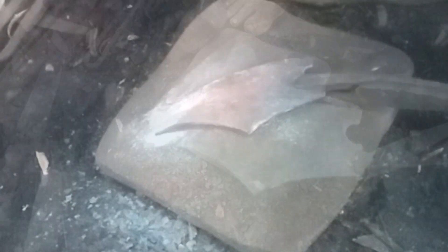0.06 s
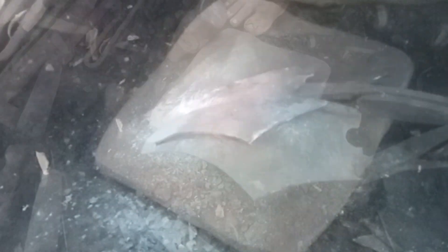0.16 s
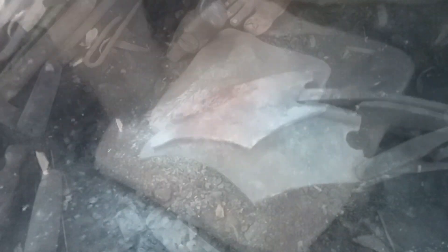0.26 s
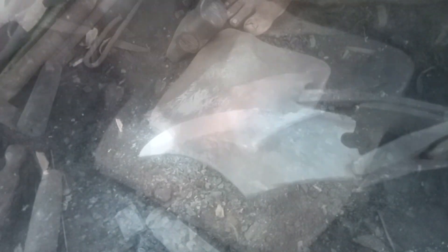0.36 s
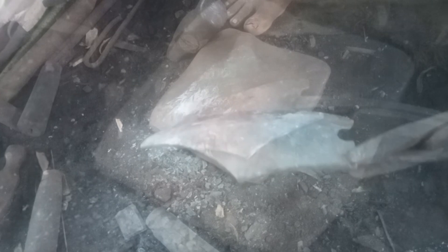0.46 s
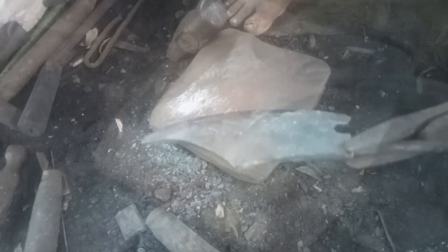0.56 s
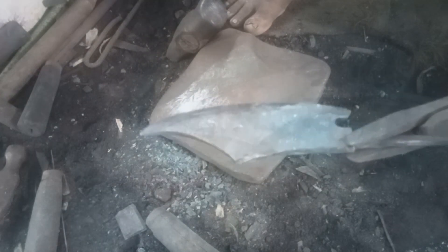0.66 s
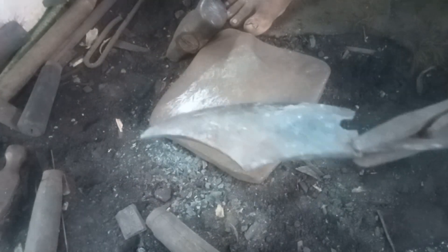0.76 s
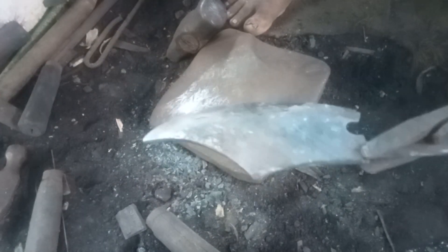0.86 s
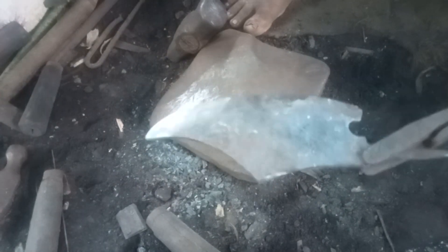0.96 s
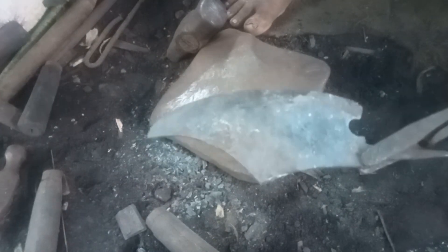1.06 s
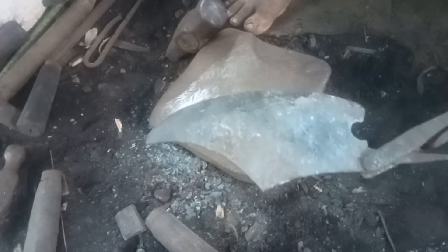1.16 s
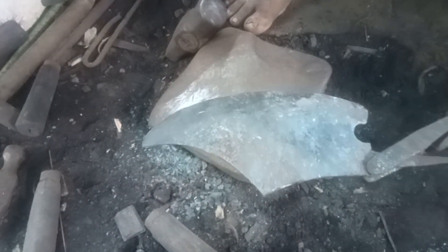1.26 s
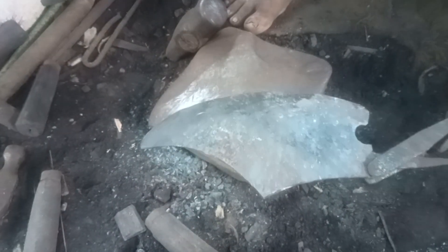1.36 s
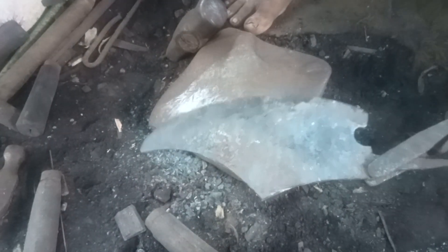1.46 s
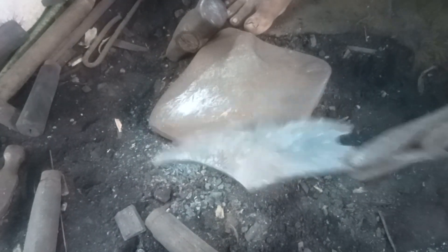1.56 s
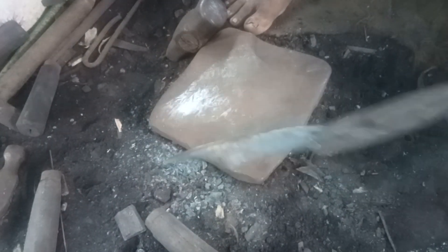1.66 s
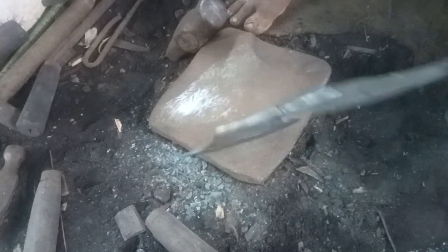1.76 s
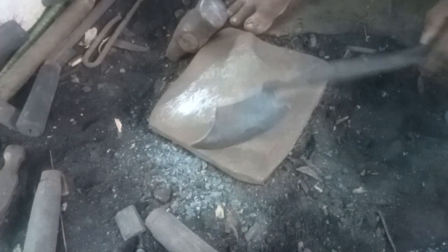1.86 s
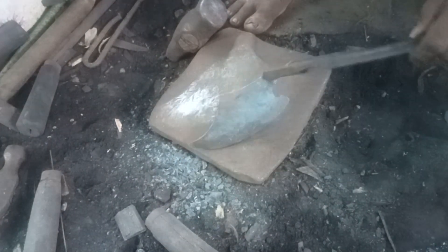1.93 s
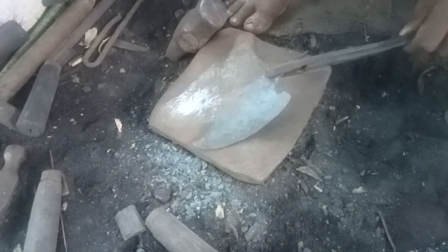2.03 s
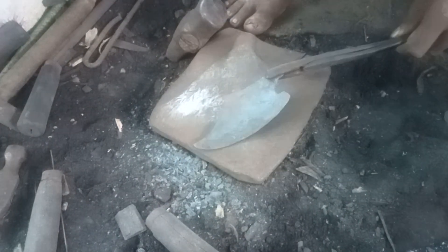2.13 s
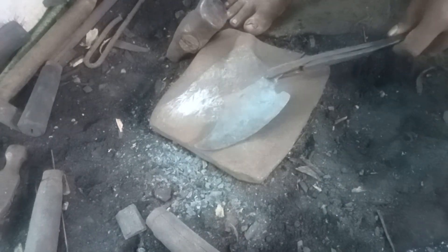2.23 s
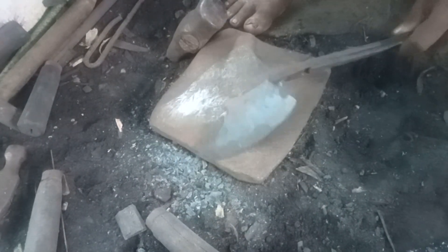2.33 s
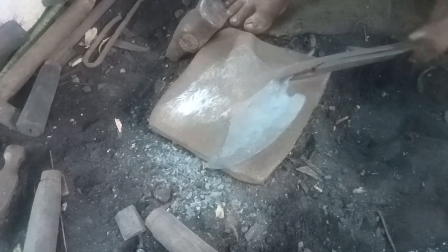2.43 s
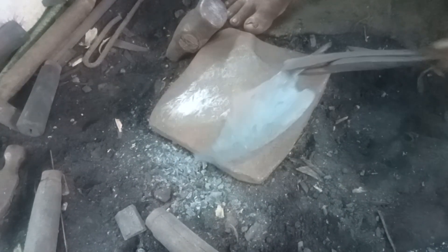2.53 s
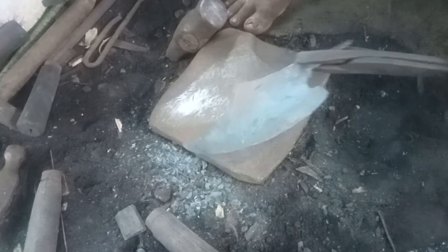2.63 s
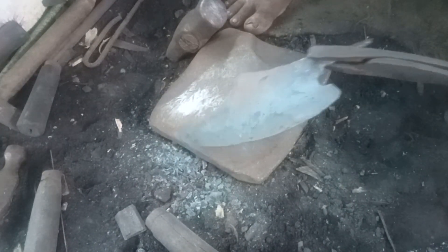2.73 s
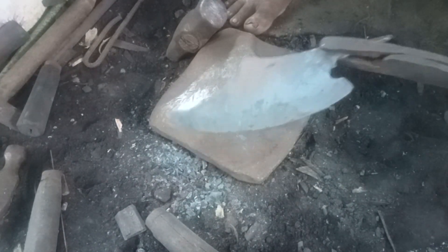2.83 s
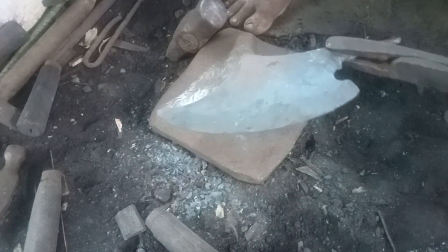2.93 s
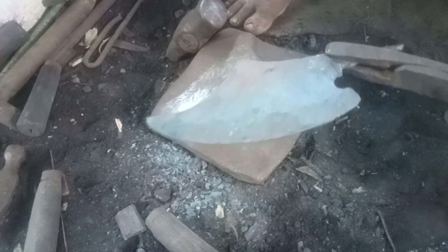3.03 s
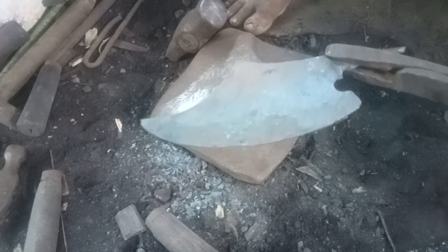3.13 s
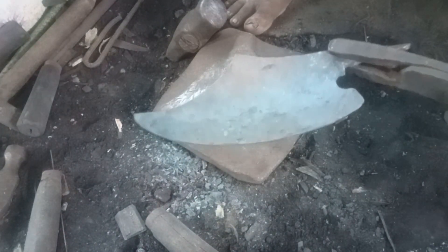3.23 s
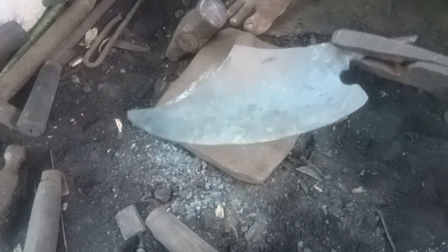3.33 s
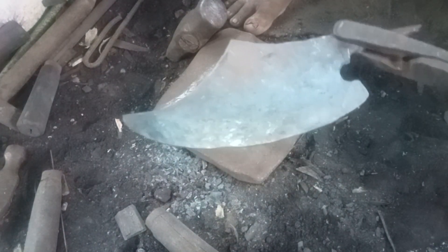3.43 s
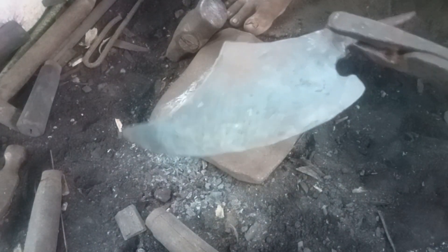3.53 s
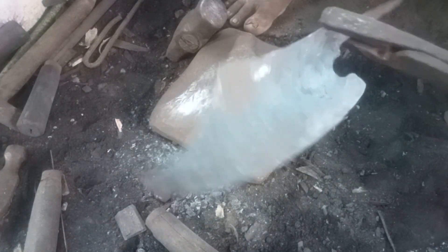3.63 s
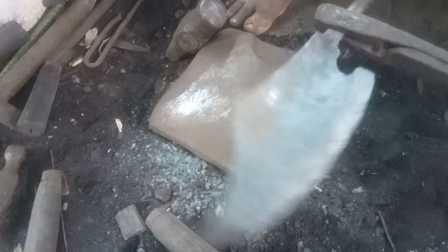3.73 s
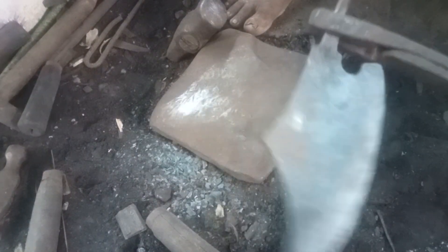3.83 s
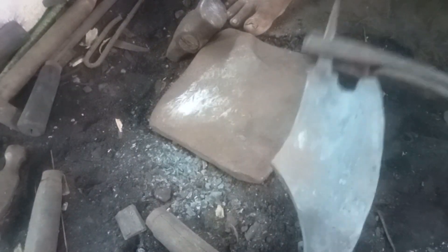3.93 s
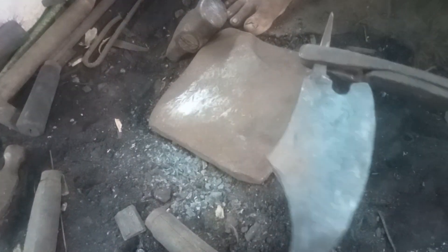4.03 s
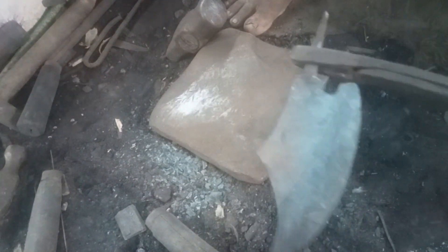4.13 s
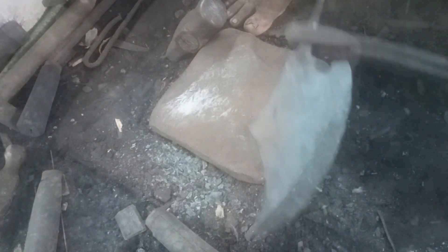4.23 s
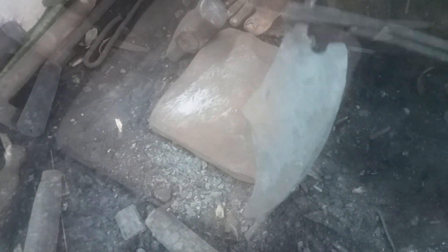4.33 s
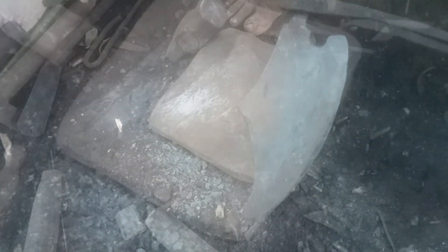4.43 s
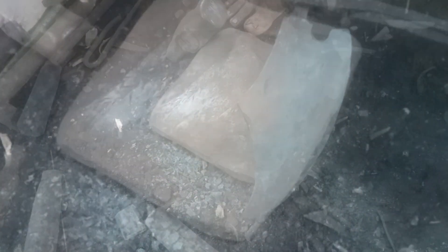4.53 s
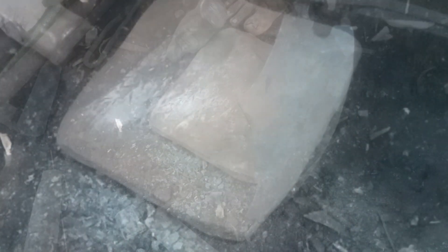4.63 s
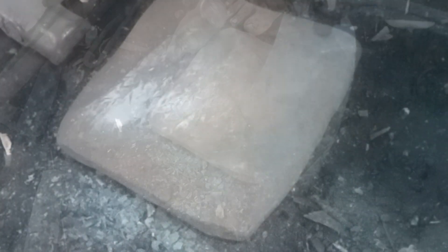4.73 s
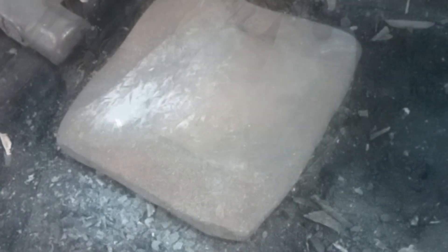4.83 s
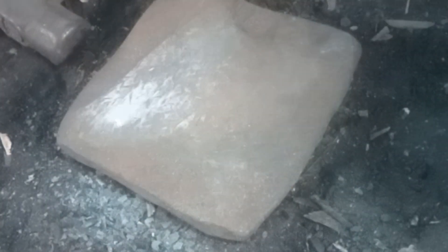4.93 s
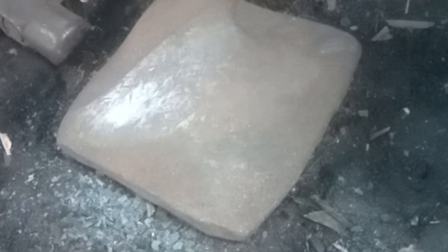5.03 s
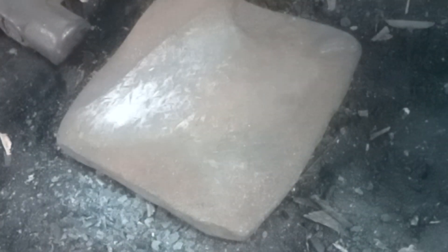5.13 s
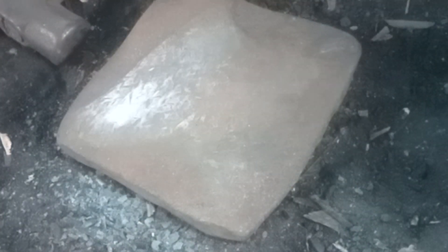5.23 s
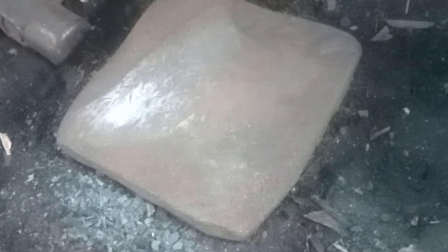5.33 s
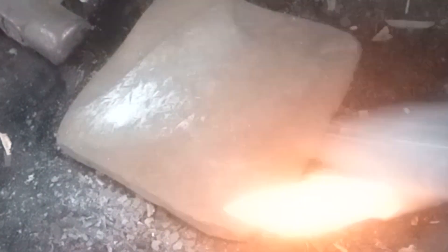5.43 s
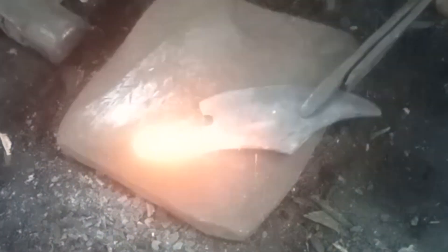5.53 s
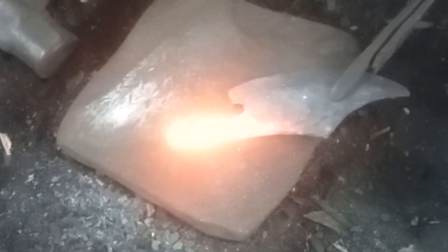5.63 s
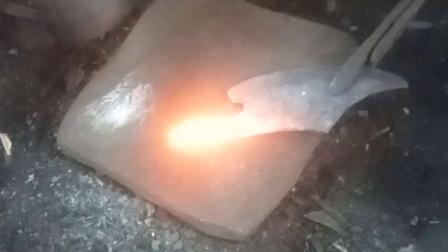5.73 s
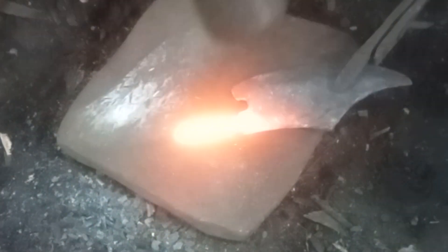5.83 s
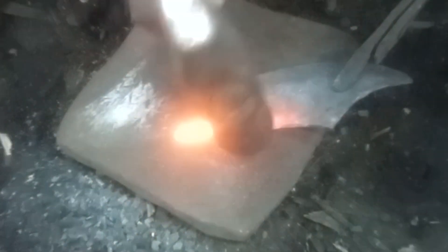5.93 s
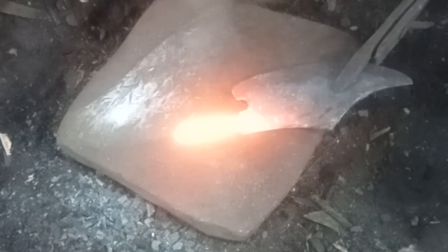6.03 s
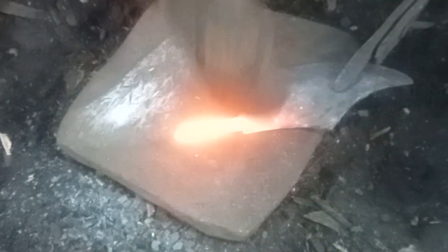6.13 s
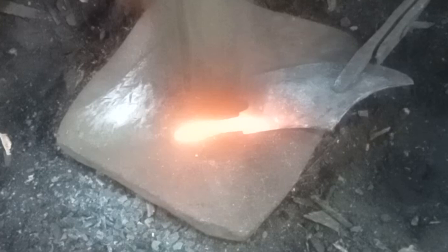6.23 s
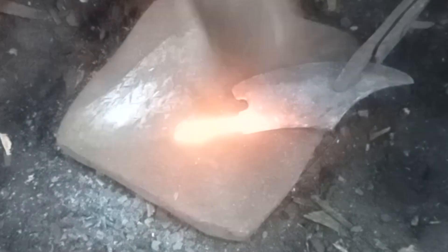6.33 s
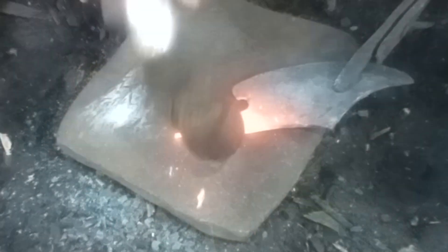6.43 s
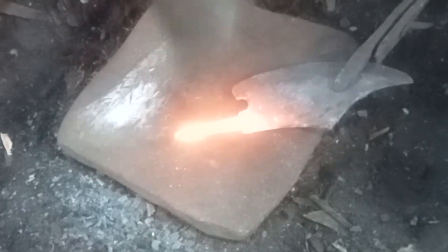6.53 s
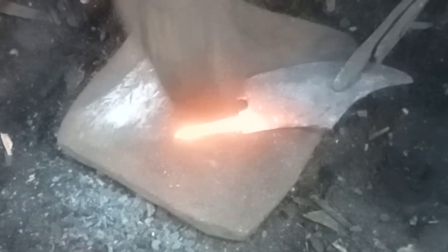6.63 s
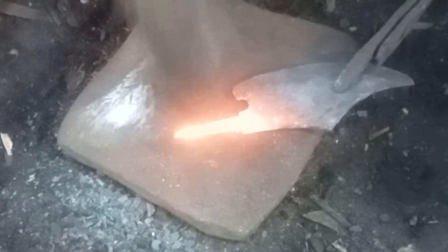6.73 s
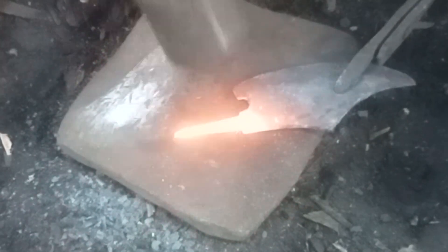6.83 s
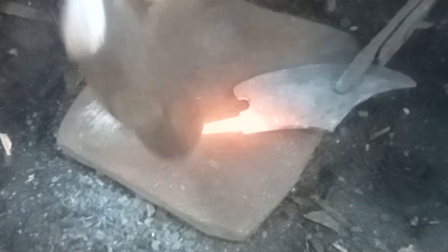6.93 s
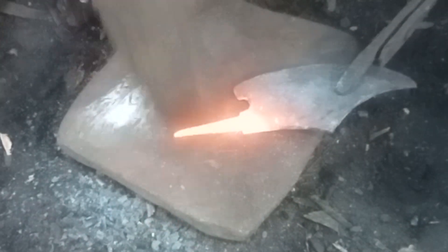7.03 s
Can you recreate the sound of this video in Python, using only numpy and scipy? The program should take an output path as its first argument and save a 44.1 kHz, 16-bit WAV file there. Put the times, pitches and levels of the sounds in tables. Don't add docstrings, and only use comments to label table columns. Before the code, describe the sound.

Steady blower hiss with fire rumble in a smithy yard, close mono pickup whose level ducks just before loud peaks. It opens with three cracking steel blows, then hiss alone until a hammer lands with a brief high metallic ring and tiny bounce. The air changes tone, a faint whine appears, a blade clinks, and rapid soft-ringing blows close it, each with a low ground thud.

```python
import sys
import numpy as np
from scipy import signal
from scipy.fft import rfft, irfft
from scipy.io import wavfile
from scipy.ndimage import uniform_filter1d

SR = 44100
rng = np.random.default_rng(int(sys.argv[2]) if len(sys.argv) > 2 else 0)


def nominal_scale(level):
    x = np.asarray(level, float) / 20
    return 10 ** x


def bounce(signal):
    frames = np.transpose(np.atleast_2d(signal))
    limited = np.clip(frames, -1, 1)
    pcm = np.round(limited * 32767).astype(np.int16)
    wavfile.write(sys.argv[1], SR, pcm)


N = 311787
HALF = SR // 2
TO_MIDDLE_S, FROM_MIDDLE_S, TO_LAST_S = 0.374, 4.0125, 4.019


def curve(table, size):
    hz, db = np.transpose(table)
    bins_hz = np.arange(size // 2 + 1) * SR / size
    return nominal_scale(np.interp(np.log(bins_hz + 1), np.log(hz), db, right=-75))


# pitch in Hz, share of the sweep time.
BENDING = [(1000, 0.55), (2000, 0.38), (4500, 0.81), (5600, 0.34)]


def colour(table, sweep_s=0., size=2048):
    cepstrum = irfft(np.log(curve(table, size)))
    cepstrum[1:size // 2] *= 2
    cepstrum[size // 2 + 1:] = 0
    lag_s = sweep_s * np.interp(np.arange(size // 2 + 1) * SR / size, *np.transpose(BENDING))
    phase = 2 * np.pi * np.cumsum(lag_s) * SR / size
    knock = irfft(np.exp(rfft(cepstrum) - 1j * phase))[:size // 2]
    return knock / np.sqrt(np.sum(knock ** 2))


def fade(t60):
    return np.exp(-np.log(1000) * np.arange(HALF) / SR / t60)


def ring(modes):
    t = np.arange(HALF) / SR
    return sum(nominal_scale(db) * fade(t60) * np.sin(2 * np.pi * hz * t) for hz, db, t60 in modes)


def add(out, s, x):
    i = int(s * SR)
    out[i:i + len(x)] += x[:N - i]


def patches(shape, bins, frames):
    field = uniform_filter1d(rng.standard_normal(shape), bins, axis=0)
    field = uniform_filter1d(field, frames, axis=1)
    return field / field.std()


def hiss(table, size=2048):
    overlap = size * 3 // 4
    wave = signal.stft(rng.standard_normal(N), nperseg=size, noverlap=overlap)[2]
    eddies_db = 2.3 * patches(wave.shape, bins=7, frames=2)
    flicker_db = 0.65 * patches(wave.shape, bins=80, frames=12)
    swell_db = 0.35 * patches(wave.shape, bins=600, frames=45)
    wave = wave * curve(table, size)[:, None] * nominal_scale(eddies_db + flicker_db + swell_db)
    out = signal.istft(wave, nperseg=size, noverlap=overlap)[1][:N]
    return out / out.std()


# pitch in Hz, level in dB per Hz.
FIRST_AIR = [(40, -21), (130, -36), (220, 1), (441, -4.5), (820, -12), (2060, -3.5), (5000, -7),
             (9180, -10.5), (13000, -19), (15700, -33), (16100, -65)]


def first_air():
    return nominal_scale(-49) * hiss(FIRST_AIR)


# pitch in Hz, level in dB, t60 in seconds, build-up in seconds.
GROUND = [(-171.5, -15.5, 0.34, 0.05), (185, -13.5, 0.41, 0.05), (202, -19, 0.13, 0.035),
          (346, -10, 0.15, .16)]
# pitch in Hz, level in dB per Hz.
SHED = [(40, -21), (120, -17.5), (180, -3), (300, -1), (450, -15), (700, -35)]


def thud(modes, shed_db):
    changes = rng.standard_normal((len(modes), 2)) * [0.003, 0.7]
    scattered = rng.standard_normal(HALF) * fade(0.33) * (1 - fade(0.011))
    out = nominal_scale(shed_db) * signal.fftconvolve(scattered, colour(SHED))[:HALF]
    for (hz, db, t60, rise_s), (detune, change_db) in zip(modes, changes):
        out += ring([(hz * (1 + detune), db + change_db, t60)]) * (1 - fade(rise_s)) ** 2
    return out


def blow(out, row, shake, crack, rattle, rattle_t60, ground=GROUND, ringing=0, ring_db=0.,
         scatter_db=-44., sweep_s=0., boom_db=None, lift_s=0.006, shed_db=-7.5):
    s, peak_db, dip_db, bright_db = row
    rattle_db, thud_db = shake
    skid, loose = rng.standard_normal((2, HALF))
    contact = nominal_scale(scatter_db) * np.diff(skid, prepend=0) * fade(0.008)
    contact[8] = 1
    edge = [(hz, db + bright_db * np.clip(2 * np.log2(hz / 4200), 0, 1)) for hz, db in crack]
    x = signal.fftconvolve(contact, colour(edge, sweep_s))[:HALF]
    x = 3 * x / np.sqrt(np.sum(x ** 2))
    echoes = 0 if boom_db is None else surroundings(x, boom_db)
    x += nominal_scale(ring_db) * ringing + echoes
    x *= nominal_scale(peak_db + dip_db + 6)
    touches_db = 2.5 * uniform_filter1d(rng.standard_normal(HALF), 60) * np.sqrt(60)
    loose = loose * nominal_scale(touches_db) * fade(rattle_t60) * (1 - fade(lift_s)) ** 2
    x += nominal_scale(rattle_db) * signal.fftconvolve(loose, colour(rattle))[:HALF]
    travel_s = 0.001205
    add(out, s + travel_s, x + nominal_scale(thud_db) * thud(ground, shed_db))


# start in seconds, peak in dB, gain dip in dB, extra treble in dB.
COLD_BLOWS = [
    (0.0179, -21.5, 14, -2),
    (0.163, -18.5, 10, 6),
    (0.302, -22.5, 14, -1),
]
# pitch in Hz, level in dB per Hz.
COLD_CRACKS = [
    [(120, -36), (230, -12), (400, -24), (715, 2), (1300, -2), (2100, 3.5), (2800, -20), (3630, -3.5),
     (4620, -6), (6090, 1.5), (7320, -11), (10800, -10), (14800, -33), (16500, -51.5)],
    [(120, -31), (200, 1), (702, 4.5), (1470, -6.5), (1900, 3), (2200, -7), (2560, 6.5), (3020, -14),
     (3770, -2), (6930, -17), (8330, -6.5), (9840, -20), (12300, -25), (16500, -47)],
    [(120, -47), (200, -12), (628, -4.5), (2700, -5), (3630, 2), (4700, -7), (6090, -12), (7600, -10),
     (10000, 3), (11200, -2), (14200, -31), (16500, -50)],
]
# pitch in Hz, level in dB per Hz.
COLD_RATTLE = [(240, -35), (400, -3.5), (648, -4), (1730, -12), (2020, -10), (2470, -8), (3120, -4),
               (4900, -0.5), (11500, -11), (15700, -30), (16500, -39.5)]
# pitch in Hz, level in dB, t60 in seconds, build-up in seconds.
COLD_GROUND = [(223.3, -8, 0.33, .05), (222.5, -1, 0.087, 0.021), (328, -2, 0.16, 0.056),
               (355, -6.5, 0.25, 0.1), (415, -8, 0.24, .1), (517, -14, 0.19, .04)]
COLD_SCATTER_DB = (-19, -14, -19)
COLD_THUD_DB = (0.5, 0.5, 3)
# start in seconds, peak in dB, gain dip in dB, extra treble in dB.
TICKS = [
    (0.1033, -39, 5, 0),
    (.1055, -22, 0, 0),
    (.1068, -29, 0, 0),
    (5.5443, -29, 4, 0),
    (5.545, -25, 0, 0),
    (5.5456, -25, 0, 0),
]
# pitch in Hz, level in dB per Hz.
TICK_CRACKS = [
    [(300, -30), (650, -11.5), (3000, -19), (6200, -14), (7400, -10), (9300, 1), (11500, -6), (13000, -22),
     (16500, -24)],
    [(180, -43), (300, 3.5), (2360, -11), (2930, -10), (5020, -1), (6450, -4), (7630, 7), (9490, 14),
     (11000, -38), (15200, 5), (16500, -33)],
]


def cold_blade():
    out = np.zeros(N)
    for row, crack, scatter_db, thud_db in zip(COLD_BLOWS, COLD_CRACKS, COLD_SCATTER_DB, COLD_THUD_DB):
        blow(out, row, (-21, -37.5 + thud_db), crack, COLD_RATTLE, rattle_t60=0.081, ground=COLD_GROUND,
             scatter_db=scatter_db, sweep_s=0.00063, shed_db=-13.5)
    for row in TICKS[:3]:
        blow(out, row, (-40.5, -72), TICK_CRACKS[0], TICK_CRACKS[0], rattle_t60=0.065)
    return out


# pitch in Hz, level in dB per Hz.
MIDDLE_AIR = [(25, -40), (131, -15), (296, -5), (600, -2), (927, -1.5), (2850, -5), (3200, -8.5),
              (3600, -8), (4450, -17), (4850, -25), (5270, -29), (5750, -21.5), (6050, -21.5), (7600, -16),
              (9300, -29.5), (12000, -34), (15000, -31.5), (15700, -30), (16000, -68)]
# pitch in Hz, level in dB per Hz.
RUMBLES = [
    [(25, -69), (60, 0), (100, -10), (140, 9.5), (190, -10), (260, -38.5)],
    [(60, -31), (110, -30), (180, -10.5), (300, -3.5), (430, 0.5), (560, -2), (700, -19)],
]
# time in seconds, swell in dB.
DRAUGHT = [(.4, 3.5), (.9, 4.5), (1.3, 0.5), (1.8, 6), (2.9, 3), (3.3, 5.5), (4.0, -1.5)]


def middle_air():
    draught_db = np.interp(np.arange(N) / SR, *np.transpose(DRAUGHT))
    hiss_share = 0.11
    blower = nominal_scale(-54 + hiss_share * draught_db) * hiss(MIDDLE_AIR)
    rumble = nominal_scale(-73 + draught_db) * hiss(RUMBLES[0])
    return blower + rumble


HAMMER_HZ = (1951, 3085, 3924, 4170, 5915, 6552, 6580, 7035, 7840, 9476, 12782, -12850, 829, 15120)
# level in dB, t60 in seconds.
HAMMER = [(-14, 0.2), (-8, 0.034), (-11.5, 0.06), (-13, 0.049), (-15, 0.06), (-0.5, 0.057), (-13.5, 0.17),
          (-11, .03), (-24, 0.15), (-10.5, 0.1), (-16, 0.17), (-11, 0.13), (-23, 0.091), (-12, 0.079)]


def head():
    rest = int(0.034 * SR)
    choke = np.roll(fade(0.045), rest)
    choke[:rest] = 1
    out = np.zeros(HALF)
    for hz, (db, t60) in zip(HAMMER_HZ, HAMMER):
        choked = abs(hz) < 6000
        out += ring([(hz, db, t60)]) * (choke if choked else 1)
    return out


# start in seconds, peak in dB, gain dip in dB, extra treble in dB.
DROP = [
    (1.9006, -26, 3.9, 0),
    (1.9246, -34, 1.1, 0),
]
# pitch in Hz, level in dB per Hz.
DROP_CRACKS = [
    [(59, -18), (250, -4), (600, -18), (830, -14), (1410, -53), (2000, -4), (3000, -6), (5210, -20),
     (6100, -17), (6730, -3), (8330, -6), (9470, -27), (10300, -34), (11240, -14), (12200, -42),
     (14200, -18), (16500, -32)],
    [(590, -50), (1000, -29), (1930, -14), (2510, 3), (4030, 1), (5280, -21), (6000, -14), (7800, -47),
     (13200, -120)],
]
# pitch in Hz, level in dB per Hz.
DROP_RATTLE = [(590, -47), (830, -21), (1400, -30), (2600, -18), (4040, -4), (4700, -17), (5350, -31),
               (6000, -14), (6610, -5), (7900, -8), (11900, -14), (13200, -15), (15600, -16),
               (16500, -51.5)]
# pitch in Hz, level in dB, t60 in seconds.
BOUNCE_RING = [(2870, -2, .025), (4040, -10, 0.059), (4170, -15, .04), (6578, -5, 0.043), (7600, -9, .06),
               (12850, -9, 0.044)]


def dropped_hammer():
    out = np.zeros(N)
    blow(out, DROP[0], (-35, -52), DROP_CRACKS[0], DROP_RATTLE, rattle_t60=0.15,
         ringing=head(), ring_db=-5)
    blow(out, DROP[1], (-42, -72), DROP_CRACKS[1], DROP_CRACKS[1], rattle_t60=0.043,
         ringing=ring(BOUNCE_RING), ring_db=-4)
    return out


# pitch in Hz, level in dB per Hz.
LAST_AIR = [(25, -51), (97, -20.5), (214, -15), (339, -19), (651, -6), (1150, -5.5), (2300, -3.5),
            (6380, -7), (9500, -12.5), (11000, -20), (12500, -30.5), (15200, -21), (16200, -38),
            (16450, -63)]
# time in seconds, level in dB.
SETTLING = [(4.02, -56), (4.12, -61), (4.35, -60), (4.6, -62), (5.0, -67.5), (5.4, -69.5), (5.9, -71),
            (7.07, -75)]


def last_air():
    settling_db = np.interp(np.arange(N) / SR, *np.transpose(SETTLING))
    return nominal_scale(-52) * hiss(LAST_AIR) + nominal_scale(settling_db) * hiss(RUMBLES[1])


def whine():
    t = np.arange(N) / SR
    whine_hz, width_hz = 1074, 30
    idle_db, open_db = -75, -67
    peak = signal.iirpeak(whine_hz, whine_hz / width_hz, fs=SR)
    wavering = signal.lfilter(*peak, rng.standard_normal(N))
    steady = np.sqrt(2) * np.sin(2 * np.pi * whine_hz * t)
    opened = np.clip((t - 4.92) / 0.4, 0, 1)
    tone = 0.5 * steady + 0.79 * wavering / wavering.std()
    return nominal_scale(idle_db + (open_db - idle_db) * opened) * tone


# pitch in Hz, level in dB per Hz.
FLUE = [(110, -40), (155, -3), (200, -17), (285, -17), (335, 1.5), (400, -10.5), (480, -35)]
# time in seconds, level in dB.
FLUE_DRAW = [(4.05, -75), (4.3, -63.5), (4.8, -63), (5.3, -65), (5.55, -69.5), (5.7, -64), (5.9, -71),
             (7.07, -67.5)]


def flue():
    draw_db = np.interp(np.arange(N) / SR, *np.transpose(FLUE_DRAW))
    puffs_db = 3.5 * patches((1, N), bins=1, frames=2600)[0]
    return nominal_scale(draw_db + puffs_db) * hiss(FLUE)


def landed(crack, dead_hz, depth_db, glint_db, boom_db):
    hz = np.geomspace(crack[0][0], crack[-1][0], num=80)
    crack_hz, crack_db = np.transpose(crack)
    db = np.interp(np.log(hz), np.log(crack_hz), crack_db)
    dead_width_octaves = 0.26
    db += depth_db * np.exp(-(np.log2(hz / dead_hz) / dead_width_octaves) ** 2)
    db += glint_db * (hz > 10000)
    db += 0.62 * boom_db * (hz < 2400)
    return list(zip(hz, db))


def taps(echoes):
    ms, db = np.transpose(echoes)
    out = np.zeros(HALF)
    out[(ms * SR / 1000).astype(int)] = nominal_scale(db)
    return out


# delay in ms, level in dB.
NEAR_ECHOES = [(1.2, -18.0), (1.95, -20.4), (2.54, -26.7), (2.9, -27.4), (3.36, -25.0), (3.88, -20.9),
               (4.2, -27.4), (4.83, -26.6), (5.26, -20.3), (5.87, -19.7), (6.19, -22.4), (7.17, -20.8),
               (7.62, -27.0), (8.05, -26.9), (8.57, -20.8), (9.91, -32.2), (10.41, -29.2), (10.98, -29.2),
               (11.36, -29.7), (11.79, -28.7), (12.2, -27.0), (12.86, -28.9), (13.17, -29.3),
               (14.13, -27.0), (14.49, -31.2), (17.85, -32.2)]
# delay in ms, level in dB.
BOOM_ECHOES = [(3.1, -31.0), (5.7, -35.0), (7.0, -39.2), (9.6, -40.4), (12.1, -35.2), (16.1, -31.9),
               (19.6, -36.7), (27.1, -41.5), (31.4, -41.5), (36.8, -46.2), (42.5, -38.7), (46.7, -48.4),
               (53.3, -39.6), (57.0, -47.3), (59.8, -46.1), (62.8, -43.9), (65.5, -43.0), (71.1, -46.1),
               (81.5, -49.9), (90.9, -47.3)]


def surroundings(crack, boom_db):
    band = signal.butter(2, (470, 15000), "band", fs=SR, output="sos")
    near = nominal_scale(-2) * signal.fftconvolve(taps(NEAR_ECHOES), signal.sosfilt(band, crack))
    boom = signal.fftconvolve(taps(BOOM_ECHOES), ring([(275, boom_db, 0.024)]))
    floor = signal.butter(4, 191, "high", fs=SR, output="sos")
    return (near + signal.sosfilt(floor, boom))[:HALF]


# pitch in Hz, level in dB per Hz.
TICK_RATTLE = [(1760, -53), (3000, -6), (4940, -15), (6720, -6), (8140, -2), (9730, -11), (11900, -27),
               (15400, -11), (16500, -35.5)]
# pitch in Hz, level in dB, t60 in seconds.
BLADE = [(8000, -4, .042), (8900, -15, .052), (8800, -23, .052), (9340, -8, 0.076), (13650, -20, .06),
         (14990, -21, .06)]
# start in seconds, peak in dB, gain dip in dB, extra treble in dB.
HOT_BLOWS = [
    (5.985, -20, 9.4, -0.5),
    (6.1525, -19.5, 9.2, 3),
    (6.3247, -20, 8.3, -7),
    (6.4867, -19, 9.8, -6),
    (6.65, -19.5, 9.9, -0.5),
    (6.808, -20, 10.3, -2.5),
    (6.953, -20, 5, -3.5),
]
# dead pitch in Hz, its depth in dB, top glint in dB, boom in dB.
HOT_PLACES = [
    (10500, -14, 2, -2.5),
    (12500, -5, 2, -2.5),
    (6840, -6, -3, -3),
    (5000, -7, 5, -1.5),
    (7800, -5, -5, -2),
    (6220, -14, 0, -0.5),
    (6000, -3, 2, 4.5),
]
# pitch in Hz, level in dB per Hz.
HOT_CRACK = [(140, -37), (230, -21), (340, -1), (542, -8), (800, -6), (1180, -10.5), (1610, 2.5),
             (2130, -5.5), (2650, 1.5), (3430, 4), (4290, 2.5), (4800, -3), (6680, -11.5), (7600, -10.5),
             (10200, -14), (12300, -41), (15300, -13), (16500, -40)]
# pitch in Hz, level in dB per Hz.
HOT_RATTLE = [(240, -45), (400, -2.5), (1930, -4), (3220, 1), (3530, 3), (4260, -0.5), (4680, -8),
              (10300, -14), (12300, -26), (15300, -17), (16500, -42)]


def hot_steel():
    out = np.zeros(N)
    for row in TICKS[3:]:
        blow(out, row, (-43.5, -61), TICK_CRACKS[1], TICK_RATTLE, rattle_t60=0.082,
             ringing=ring(BLADE), ring_db=-17)
    for row, place in zip(HOT_BLOWS, HOT_PLACES):
        boom_db = place[3]
        blow(out, row, (-29.5, -37.5 + boom_db / 2), landed(HOT_CRACK, *place), HOT_RATTLE, rattle_t60=0.081,
             scatter_db=-27, sweep_s=0.00063, boom_db=boom_db, lift_s=0.013, shed_db=-12)
    return out


def scene():
    t = np.arange(N) / SR
    first = cold_blade() + first_air()
    middle = dropped_hammer() + middle_air()
    last = hot_steel() + last_air() + whine() + flue()
    fade_in_s = 0.12
    last *= np.clip((t - TO_LAST_S) / fade_in_s, 0.004, 1) ** 0.97
    mono = np.where(t < TO_MIDDLE_S, first, np.where(t < FROM_MIDDLE_S, middle, last))
    return np.tile(mono, (2, 1))


def low_pass(x):
    return signal.sosfilt(signal.butter(12, 16880, fs=SR, output="sos"), x)


def record(dry):
    t, gain_db = np.arange(N) / SR, np.zeros(N)
    ahead_s, fall_s, recover_s = 0.009, 0.00066, 0.036
    for s, _, dip_db, _ in [*COLD_BLOWS, *HOT_BLOWS, *TICKS, *DROP]:
        fall = 1 - np.exp(-np.clip(t - s + ahead_s, 0, None) / fall_s)
        recovery = np.exp(-(np.clip(t - s, 0, None) / recover_s) ** 1.8)
        gain_db -= dip_db * fall * recovery
    ceiling = 0.3
    held = ceiling * np.tanh(dry * nominal_scale(gain_db) / ceiling)
    top_cut = signal.ellip(8, 0.2, 70, 16600, fs=SR, output="sos")
    return low_pass(signal.sosfilt(top_cut, held))


dry = scene()
out = record(dry)
bounce(out)
```